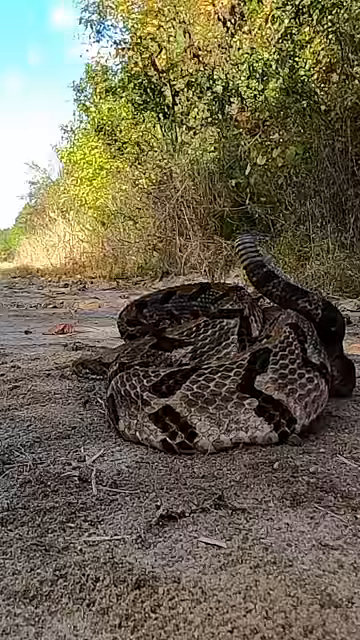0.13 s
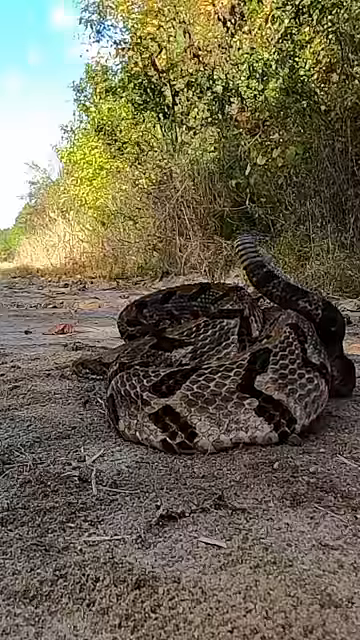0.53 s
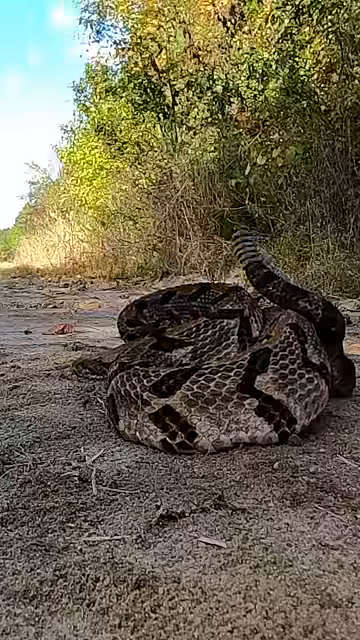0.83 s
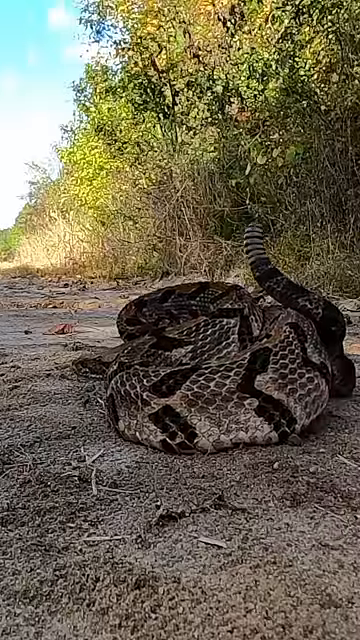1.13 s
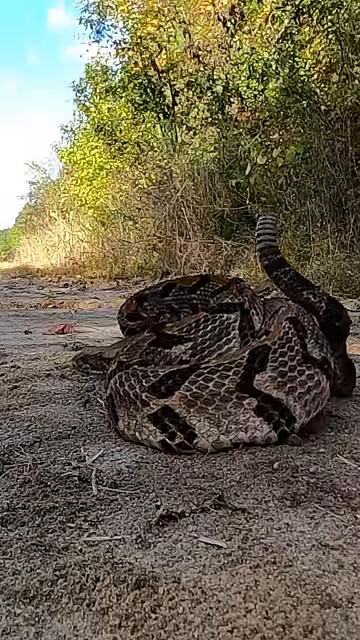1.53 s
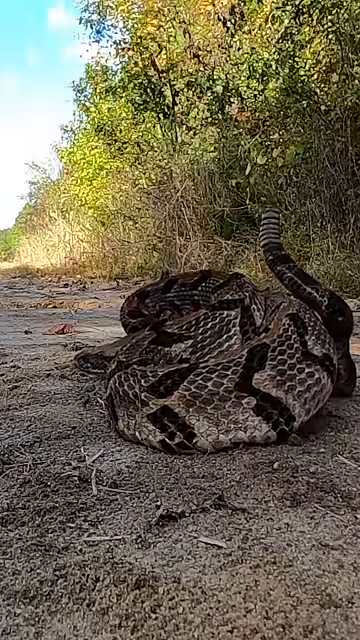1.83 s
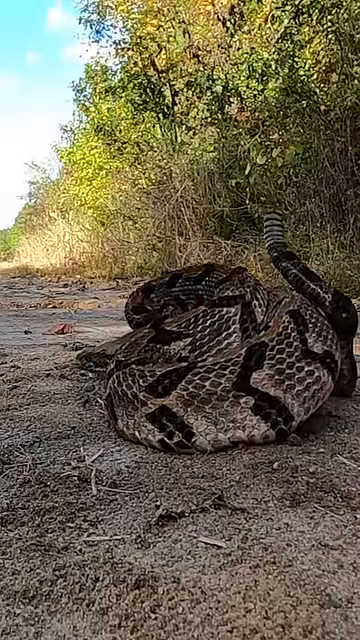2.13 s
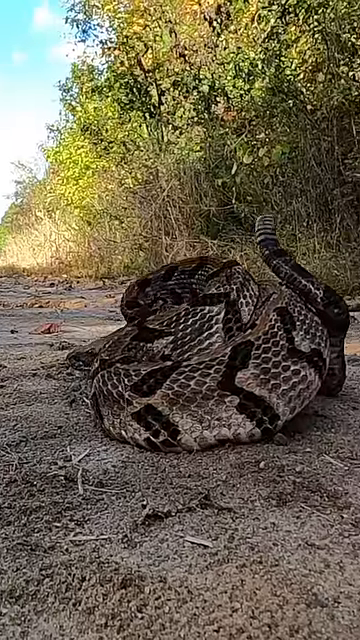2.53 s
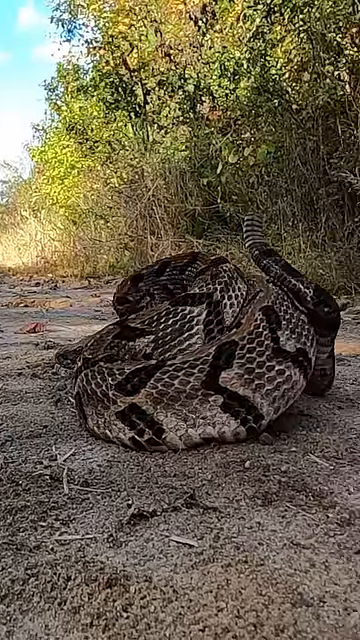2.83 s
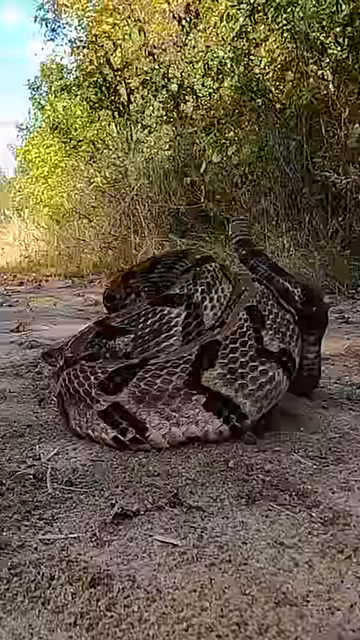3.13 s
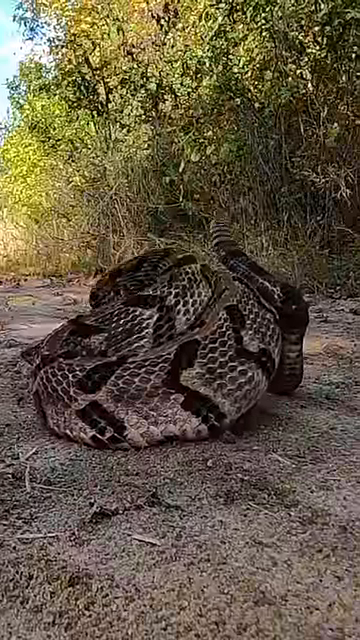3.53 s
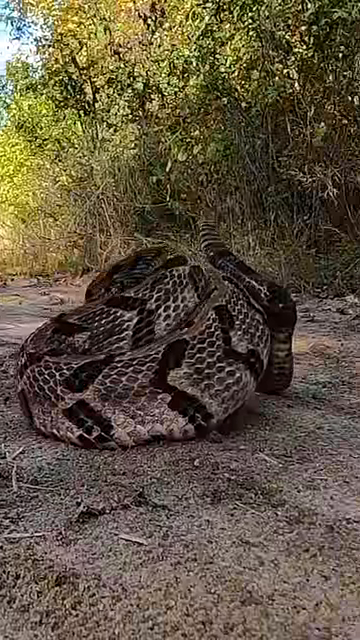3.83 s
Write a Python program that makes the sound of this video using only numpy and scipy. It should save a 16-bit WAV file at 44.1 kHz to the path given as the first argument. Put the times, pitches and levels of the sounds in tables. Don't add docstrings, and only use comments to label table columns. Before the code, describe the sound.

A rattlesnake's rattle dominates, close and dry outdoors. First, over faint air, wind and thin insect hiss, two gritty footsteps fall on the left at about 0.1 and 0.7 seconds, with dull thumps and snapping twigs or pebbles. At 0.96 the rattle twitches briefly; from 1.05 it buzzes fast and steadily to 4 seconds, bright and hissing, its tone shifting slightly after 2.3 as the background sinks beneath it.

```python
import sys
import numpy as np
from scipy import signal
from scipy.fft import rfft, irfft
from scipy.io import wavfile
from scipy.ndimage import uniform_filter1d

SR = 44100
rng = np.random.default_rng(int(sys.argv[2]) if len(sys.argv) > 2 else 0)


def ratio_of_db(decibels):
    return 10 ** (np.asarray(decibels, float) / 20)


def dump(signal):
    limited = np.clip(np.atleast_2d(signal).T, -1, 1)
    pcm = np.round(limited * 32767).astype(np.int16)
    wavfile.write(sys.argv[1], SR, pcm)


N = 176400


def rattle():
    # start_s, level_db
    twitch = [
        (.944, -60),
        (.956, -47),
        (.958, -21.5),
        (0.969, -18),
        (0.972, -25.5),
        (0.992, -24),
        (.996, -30.5),
        (1.041, -42),
        (1.047, -20),
    ]
    # start_s, level_db, half_swings_per_s, microphone_moved (0-1)
    shake = [
        (1.05, -21.5, 113, 0.02),
        (1.199, -20.5, 116, 0),
        (1.45, -22, 131, 0.1),
        (1.9, -20.5, 121, 0.1),
        (2.349, -22, 124, 0.5),
        (2.7, -21.5, 116.3, .75),
        (3.3, -22, 113, 0.95),
        (4.0, -22.5, 123, 0.95),
    ]
    # pitch_hz, level_db (per Hz)
    shell = [(330, -33), (1030, -15.5), (2050, -13), (2900, -2.5), (4200, 0), (6400, -1), (9800, -13),
             (15500, -30)]
    # pitch_hz, width_hz, depth_db (negative = bump)
    ground_first = [(1050, 200, -2), (4870, 330, 11), (5800, 500, 1.1), (4200, 300, -1.1), (7900, 900, 1.5),
                    (13000, 1600, 4)]
    # pitch_hz, width_hz, depth_db (negative =
    ground_second = [(1050, 200, -3), (3400, 350, 8), (2500, 500, 2.5), (4900, 400, 1.5), (4000, 250, -2.5),
                     (8200, 500, 1.5), (14600, 1100, 6)]

    still_half_swings, still_moved = shake[0][2:]
    opening = [(s, db, still_half_swings, still_moved) for s, db in twitch]
    level_db, rate, moved = in_time(opening + shake)
    swings = np.cumsum(rate) / SR

    def beat(lag):
        sharpness = 4
        return np.exp(sharpness * (np.cos(2 * np.pi * (swings - lag)) - 1))

    loose_share, rebound_lag = 1.05, 0.58
    rebound = 0.15 + (0.62 - 0.15) * moved
    push = loose_share + beat(0) + rebound * beat(rebound_lag)

    swing_db = 0.8 * rng.standard_normal(1200)
    force_db = swing_db[(2 * swings + 0.4).astype(int)] + 0.35 * drift(6.8)
    clacks = grains(per_s=12000, spread_db=2.6) * push * ratio_of_db(force_db)
    clacks = clacks * np.array([np.ones(N), rng.choice([-1, 1], N)])

    segment_hz, segment_width_hz = np.linspace(600, 15600, 16), 850
    dealt = rng.integers(0, 16, (2, N))
    rings = sum(resonance(clacks * (dealt == k), hz, segment_width_hz) for k, hz in enumerate(segment_hz))
    broad_share = 0.35
    raw = rms_one(rms_one(rings) + broad_share * rms_one(clacks))
    raw = raw * ratio_of_db(level_db) * (np.arange(N) > twitch[0][0] * SR)

    at_first_place = colour(raw, at_hz(shell) + dips(ground_first))
    at_second_place = colour(raw, at_hz(shell) + dips(ground_second))
    moved = np.clip(moved, 0, 1)
    makeup_db = 12
    return ratio_of_db(makeup_db) * ((1 - moved) * at_first_place + moved * at_second_place)


def ports(both):
    # pitch_hz, left_minus_right_db
    port_db = [(1500, -1.5), (3400, 1.2), (4400, 1.1), (5400, -6), (7100, 2.5), (7600, 0), (8150, 0),
               (8400, -5), (9800, -4), (10600, -.7), (15500, -2)]
    # (fully opposed near 7.9 kHz, almost so above 10.5
    # kHz)
    port_rad = [(0, 0), (1550, -.5), (2150, -.35), (4570, -1.6), (5770, -1.3), (6980, -1.8), (7550, -np.pi),
                (8150, -np.pi), (8450, -2.2), (9300, -1.85), (10100, -2.0), (10500, -3.1), (15500, -3.1)]
    # pitch_hz, width_hz, depth_db (negative = bump)
    unlike_dips = [(4900, 400, -5), (6900, 400, -3), (7870, 380, 20), (9300, 800, -4), (11200, 800, 4.5),
                   (13000, 900, 0), (15000, 1100, -10.5)]

    flicker_db, unlike_db = 3.5, -13
    shared, unlike = rfft([both[0], both[1] * ratio_of_db(flicker_db * drift(16))], 2 * N)
    unlike = ratio_of_db(unlike_db + dips(unlike_dips)) * unlike
    tilt_db = at_hz(port_db)
    lead = np.interp(grid_hz(), *np.transpose(port_rad))
    heard = []
    for side in (1, -1):
        spectrum = (shared + side * unlike) * ratio_of_db(side * tilt_db / 2) * np.exp(0.5j * side * lead)
        heard.append(irfft(spectrum, 2 * N)[:N])
    return np.array(heard)


def footsteps():
    # start_s, crunch_length_s, crunch_db, thump_db
    steps = [
        (0.117, 0.13, -41, -26.5),
        (0.706, 0.15, -39, -29.5),
    ]
    # pitch_hz, level_db (per Hz)
    grit_tone = [(410, -51), (700, -25), (838, -41), (990, -16.5), (2000, -0.5), (4210, -1), (12100, -23.5),
                 (15000, -39)]
    # start_s, peak_db, pitch_hz, ring_cycles
    snaps = [(.053, -27.5, 1530, 6.5), (0.106, -44, 6030, 25), (.118, -34, 4260, 8),
             (.130, -25.5, 3050, 11), (.172, -33, 4500, 25), (.178, -30, 9000, 8.8), (.215, -31, 4460, 19),
             (0.236, -38, 3100, 6), (.278, -33, 1520, 8.7), (.703, -36, 2090, 5), (0.7248, -30, 2800, 5),
             (.725, -36, 5200, 8), (.746, -28, 4330, 18), (0.748, -26, 3060, 16), (0.8087, -19.5, 2410, 7),
             (0.809, -26, 7000, 5.3), (.834, -34, 5450, 64), (.838, -34, 5900, 56), (.841, -36, 5600, 41),
             (0.868, -33.5, 1710, 8)]

    t = np.arange(N) / SR
    crunch, thump = np.zeros(N), np.zeros(N)
    clumps_db = 2.6 * drift(70)
    grit = grains(per_s=7000, spread_db=4) * ratio_of_db(clumps_db)
    grit = rms_one(colour(grit, at_hz(grit_tone)))
    release_s, thump_hz, thump_t60_s = 0.073, 189, 0.031
    for s, length, crunch_db, thump_db in steps:
        begun = t > s
        fade_db = -6 * np.clip((t - s) / length, 0, 1) - 20 * np.maximum(t - s - length, 0) / release_s
        crunch += grit * ratio_of_db(crunch_db + fade_db) * begun
        thump_level = ratio_of_db(thump_db - 60 * np.maximum(t - s, 0) / thump_t60_s)
        thump += thump_level * np.sin(-2 * np.pi * thump_hz * (t - s)) * begun

    age = np.arange(1200) / SR
    for s, db, hz, cycles in snaps:
        first = int(s * SR)
        rise = np.minimum(1, 12 * age * hz / cycles)
        ring = ratio_of_db(db - 60 * age * hz / cycles) * rise * np.sin(2 * np.pi * hz * age)
        crunch[first:first + len(age)] += 2 * ring

    lag_s, pan_db = 0.00015, 8.5
    late = np.interp(t - lag_s, t, crunch)
    pair = np.array([crunch, late * ratio_of_db(-pan_db)])
    return 1.29 * colour(pair, dips([(7500, 190, 8.2)])) + low_cut(thump)


def background():
    # pitch_hz, level_db
    air_tone = [(100, -19.5), (150, -3), (375, -12), (750, -21.5), (1150, -17), (3900, -32), (6800, -32.5),
                (15000, -55)]
    # start_s, level_db
    gusts = [
        (0, -59),
        (.2, -56),
        (.7, -58),
        (1.0, -61),
        (2.4, -67),
        (2.55, -62),
        (2.8, -64),
        (4.0, -66),
    ]

    mid, side = low_cut(colour(rng.standard_normal((2, N)), at_hz(air_tone)))
    alike = 0.47
    air = np.sqrt(1 + alike) * mid + np.sqrt(1 - alike) * side * [[1], [-1]]
    air = air / np.std(mid) / np.sqrt(1 + alike)
    air = air * ratio_of_db(-53.5 + drift(6.5))

    insect_hz, insect_width_hz = 7070, 500
    insects = resonance(rng.standard_normal((2, N)), insect_hz, insect_width_hz)
    insects = rms_one(resonance(insects, insect_hz, insect_width_hz))
    insects = insects * ratio_of_db(-71 + 3 * drift(5))

    wind_band = signal.butter(2, [15, 63], "band", fs=SR, output="sos")
    wind = signal.sosfilt(wind_band, rng.standard_normal((2, N)))
    lumps_db = -4 * np.array([drift(10), drift(5)])
    wind = rms_one(wind * ratio_of_db(lumps_db))
    wind = (wind - 0.2 * wind[::-1]) * ratio_of_db(in_time(gusts)[0])
    return air + insects + wind


def grains(per_s, spread_db):
    size = ratio_of_db(spread_db * np.minimum(rng.exponential(1, N), 4))
    sign = rng.choice([-1, 1], N)
    return size * sign * (rng.random(N) < per_s / SR)


def resonance(x, hz, width_hz):
    r = np.exp(-np.pi * width_hz / SR)
    ring = [1, -2 * r * np.cos(2 * np.pi * hz / SR), r * r]
    return signal.lfilter([(1 - r * r) / 2, 0, (r * r - 1) / 2], ring, x + 1e-18)


def drift(rate):
    r = np.exp(-80 * np.pi * rate / SR)
    noise = rng.standard_normal(N // 40 + 2002)
    slow = rms_one(signal.lfilter([1], [1, -2 * r, r * r], noise)[2000:])
    return np.interp(np.arange(N) / 40, np.arange(len(slow)), slow)


def colour(x, db):
    cep = irfft(db * np.log(10) / 20, 2 * N)
    cep[1:N] *= 2
    cep[N + 1:] = 0
    return irfft(rfft(x, 2 * N) * np.exp(rfft(cep)), 2 * N)[..., :N]


def dips(rows):
    return -sum(db * np.exp(-((grid_hz() - hz) / width) ** 2) for hz, width, db in rows)


def low_cut(x):
    return signal.sosfilt(signal.butter(4, 134, "high", fs=SR, output="sos"), x)


def grid_hz():
    return np.arange(N + 1) * SR / (2 * N) + 1


def at_hz(points):
    hz, db = np.transpose(points)
    return np.interp(np.log(grid_hz()), np.log(hz + 1), db)


def in_time(rows):
    s, *columns = np.transpose(rows)
    return [np.interp(np.arange(N) / SR, s, c) for c in columns]


def rms_one(x):
    return x / np.sqrt(np.mean(x ** 2) + 1e-20)


def scene():
    return ports(rattle()) + footsteps() + background()


def top_cut(x):
    return signal.sosfilt(signal.butter(12, 15720, fs=SR, output="sos"), x)


def record(dry):
    knee_db, slope, attack_s, release_db_per_s = -32.5, 0.26, 0.0013, 70
    t = np.arange(N) / SR
    power = uniform_filter1d(np.mean(dry ** 2, axis=0), size=882)
    level_db = 10 * np.log10(power + 1e-12)
    held = np.maximum.accumulate(level_db + release_db_per_s * t) - release_db_per_s * t
    r = np.exp(-1 / (attack_s * SR))
    cut_db = signal.lfilter([1 - r], [1, -r], slope * np.maximum(held - knee_db, 0))
    return top_cut(dry * ratio_of_db(-cut_db))


dry = scene()
out = record(dry)
dump(out)
```